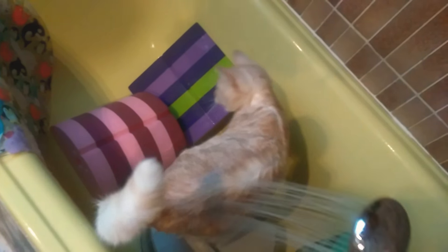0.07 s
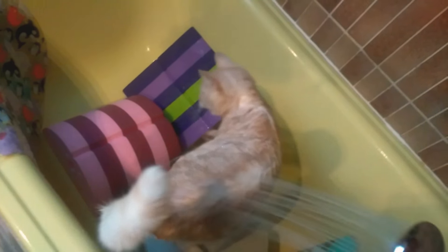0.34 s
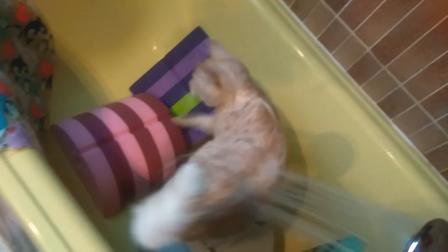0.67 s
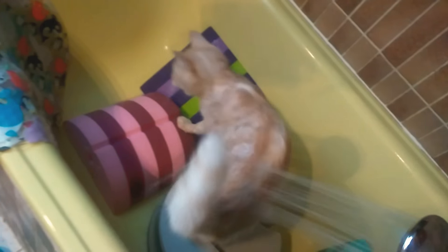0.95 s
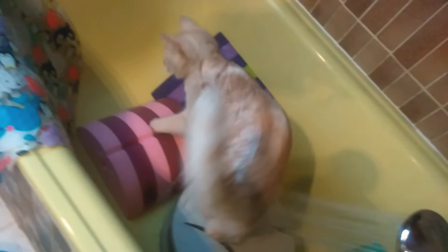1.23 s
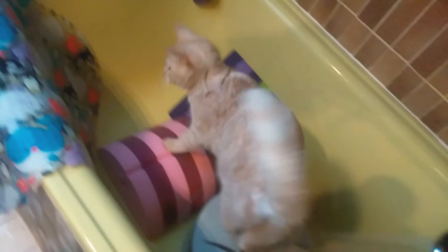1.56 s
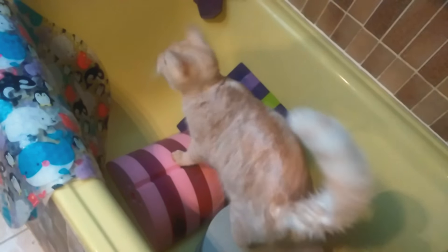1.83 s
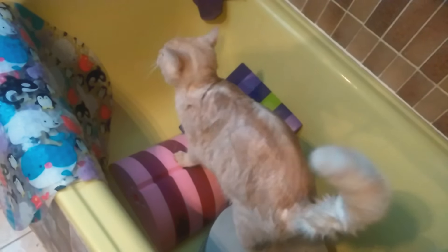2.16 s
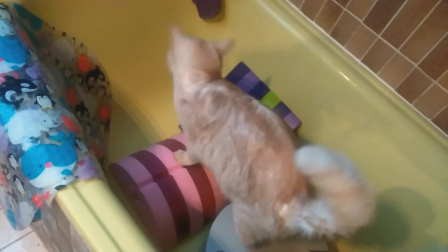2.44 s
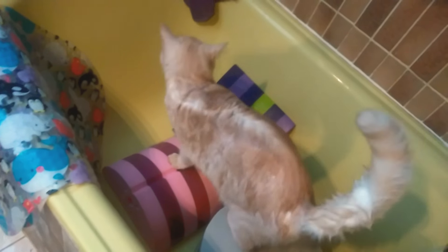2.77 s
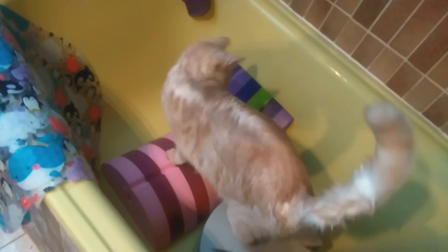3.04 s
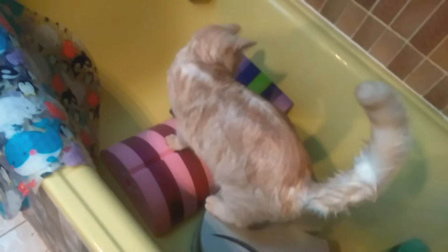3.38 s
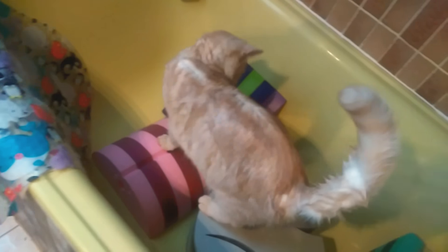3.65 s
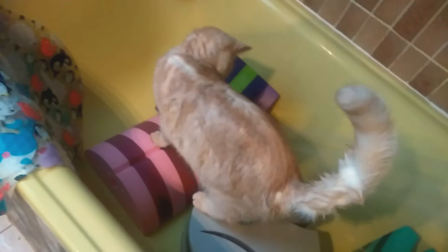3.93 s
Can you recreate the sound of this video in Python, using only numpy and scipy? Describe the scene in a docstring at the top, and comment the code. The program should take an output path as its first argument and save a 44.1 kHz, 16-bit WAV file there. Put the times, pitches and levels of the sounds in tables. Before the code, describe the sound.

Shower water spraying and splashing in a bathtub, with a couple of sharp clicks.

```python
"""A cat in a bathtub under a hand shower, in a small tiled bathroom, heard on two microphones
15 cm apart and of opposite polarity. After a short knock the jets drum on something hollow and a sharp
click rings off the tiles. About a second in they swing away: the drumming drops to the tub floor and
the droplets' hiss builds, with a second sharp click near 2.4 s. Larger bubbles ring toward the end.
Throughout, water runs down the tub with gushes of splatter, small bubbles and fainter ticks."""
import sys
import numpy as np
from scipy import signal
from scipy.fft import rfft, irfft, next_fast_len
from scipy.io import wavfile
from scipy.ndimage import uniform_filter1d, map_coordinates

SR = 44100
rng = np.random.default_rng(int(sys.argv[2]) if len(sys.argv) > 2 else 0)


def transcribe(signal):
    """Save signal, clipped to [-1, 1], as a 16-bit WAV file at the path in sys.argv[1]."""
    frames = np.atleast_2d(signal).T
    limited = np.clip(frames, -1, 1)
    pcm = np.round(limited * 32767).astype(np.int16)
    wavfile.write(sys.argv[1], SR, pcm)


N = 176400  # 4 s


def amp(db):
    """Decibels to gain."""
    return 10 ** (np.asarray(db) / 20)


def unit(x):
    """Scale to rms 1."""
    return x / np.sqrt(np.mean(x ** 2) + 1e-20)


def along(points, hz):
    """Read (freq_hz, value) points at hz, on a log frequency axis."""
    f, v = np.transpose(points)
    return np.interp(np.log(hz + 1), np.log(f + 1), v)


def curve(rows):
    """Join (time_s, value) points, one value per sample."""
    return np.interp(np.arange(N) / SR, *np.transpose(rows))


def wobble(rate):
    """A smooth random curve, rate knots a second."""
    return map_coordinates(rng.standard_normal(1024), [np.arange(N) * rate / SR], mode="mirror")


def filtered(x, response):
    """Filter x by a complex response of frequency."""
    size = next_fast_len(N + SR // 2)
    return irfft(rfft(x, size) * response(np.fft.rfftfreq(size, 1 / SR)), size)[..., :N]


def resonance(f, hz, width):
    """The response of one damped mode, width in Hz."""
    return 1j * f * width / (hz * hz - f * f + 1j * f * width)


def add(out, start_s, sound):
    """Mix a stereo sound in at start_s."""
    part = out[:, max(round(start_s * SR), 0):][:, :sound.shape[1]]
    part += sound[:, :part.shape[1]]


# Decay of the tiled bathroom: freq_hz, t60_s
ROOM_DECAY = [(200, .5), (3000, .2)]
def in_room(sound, walls_db=-3, tail_db=-2, walls_fade_s=.03, right_lag_s=.00014):
    """A short sound reaches the left microphone first, then bounces off tub and tiles and dies away."""
    hz, t, noise = signal.stft(rng.standard_normal((2, SR // 3)), SR, nperseg=256)
    tail = signal.istft(noise * amp(-60 * t / along(ROOM_DECAY, hz)[:, None]), SR, nperseg=256)[1]
    echoes = amp(tail_db) * tail / np.linalg.norm(tail[0])
    for mic in echoes:
        delay_s = .001 + .024 * rng.random(20) ** 2
        bounces = rng.choice([-1, 1], 20) * np.exp(-delay_s / walls_fade_s)
        np.add.at(mic, (delay_s * SR).astype(int), amp(walls_db) * bounces / np.linalg.norm(bounces))
    echoes[[0, 1], [0, round(right_lag_s * SR)]] += 1  # direct path
    return signal.fftconvolve(sound[None], echoes, axes=1)


def standing_waves(x, ripple_db=1.3, step_hz=20):
    """The small room favours some frequencies and starves their neighbours."""
    knots = rng.standard_normal(4096)
    ripple = lambda f: map_coordinates(knots, [f / step_hz], mode="mirror")
    return filtered(x, lambda f: amp(ripple_db / (1 + f / 8000) * ripple(f)))


def diffuse(pair, spacing_m=.15, sound_m_per_s=343):
    """Sound from all sides: alike at both microphones in the bass, unrelated in the treble."""
    def response(f):
        likeness = 0.96 * np.sinc(2 * f * spacing_m / sound_m_per_s) / (1 + (f / 1500) ** 4)
        angle = np.arccos(likeness) / 2
        return np.array([np.cos(angle), np.sin(angle)])
    mid, side = filtered(pair, response)
    return np.array([mid + side, mid - side])


def impacts(rate, spread_db, blur_db):
    """Two trains of random drop impacts, rate a second, in a blur of their echoes."""
    size = amp(spread_db * np.minimum(rng.exponential(size=(2, N)), np.pi))
    drops = (rng.random((2, N)) < rate / SR) * size * rng.choice([-1, 1], (2, N))
    return unit(drops) + amp(blur_db) * rng.standard_normal((2, N))


def patter(response, rate, spread_db, blur_db):
    """Drop impacts from all sides, coloured by response and by the room; rms 1."""
    drops = diffuse(impacts(rate, spread_db, blur_db))
    return unit(standing_waves(filtered(drops, response)))


def patchy(x, depth_db):
    """The colour of the splatter shifts from moment to moment; rms 1."""
    spectra = signal.stft(x, nperseg=512)[2]
    patches = uniform_filter1d(rng.standard_normal(spectra.shape[1:]), size=12, axis=0)
    patches = unit(uniform_filter1d(patches, size=9, axis=1))
    return unit(signal.istft(spectra * amp(depth_db * patches), nperseg=512)[1][:, :N])


def nozzle():
    """The shower head's own thin, steady fizz."""
    fizz = patter(lambda f: resonance(f, hz=11400, width=7100) ** 2, rate=3000, spread_db=9.5, blur_db=0)
    return fizz * amp(-56.5 + 0.94 * wobble(24.4))


def singing():
    """A narrow, flickering band of hiss near 3 kHz, heard early and again late."""
    band = unit(filtered(rng.standard_normal((2, N)), lambda f: resonance(f, hz=3030, width=300)))
    level_db = curve([(1, -56), (1.5, -64), (3.1, -73), (3.7, -52.5)])
    return band * amp(level_db + 0.47 * wobble(26.5))


def bubble(hz, t60, rise=0.099):
    """A bubble's ring starts softly and rises in pitch as it dies."""
    t = np.arange(SR // 8) / SR
    phase = 2 * np.pi * hz * (t + rise * t * t / (2 * t60))
    onset = 1 - np.exp(-t / 0.00079)
    return np.sin(phase) * amp(-60 * t / t60) * onset


# A short knock at the start, then larger bubbles near the end: start_s, pitch_hz, level_db, t60_s
KNOCK_AND_BUBBLES = [(.003, 2440, -15.5, 0.006), (3.367, 2790, -32.5, 0.019), (3.452, 1860, -38.5, 0.033),
                     (3.608, 2590, -39.5, .03), (3.664, 3580, -38, .017), (3.806, 860, -33.5, 0.012),
                     (3.818, 1230, -36, 0.035)]
def bubbles(small_count=130, ring_cycles=35):
    """One very short ring sounds as a knock; a few distinct bubbles ring among many faint ones."""
    out = np.zeros((2, N))
    for start_s, hz, db, t60 in KNOCK_AND_BUBBLES:
        add(out, start_s, amp(db) * in_room(bubble(hz, t60)))
    for when, pitch, strength in rng.random((small_count, 3)):
        hz, db = 1400 * 5 ** pitch, -55 + 11 * strength ** 2
        add(out, when * N / SR, amp(db) * in_room(bubble(hz, ring_cycles / hz)))
    return out


# Modes that ring in a click: pitch_hz, level_db, t60_s
CLICK_RING = [(2600, -6, .016), (2900, -5, .012), (3280, -7, .01), (4050, -5, .009), (4700, -13, .007),
              (8300, -20, .01)]
# Sharp clicks and fainter ticks: start_s, level_db, pitch_ratio
CLICK_HITS = [(.125, -21, 1), (0.4176, -40.5, 1.6), (0.992, -38.5, 0.96), (1.034, -33.5, 1.02),
              (1.296, -35, 2.1), (2.43, -29, 1.2), (3.723, -55, 1.2)]
def clicks():
    """Short hard clicks without bass ring off the tiles, a little left of the microphones."""
    t, out = np.arange(SR // 20) / SR, np.zeros((2, N))
    low_cut = signal.butter(6, 2250, "highpass", fs=SR, output="sos")
    for start_s, db, ratio in CLICK_HITS:
        ring = sum(amp(mode_db - 60 * t / t60) * np.sin(2 * np.pi * hz * ratio * t)
                   for hz, mode_db, t60 in CLICK_RING)
        crack = amp(-16 - 60 * t / .008) * rng.standard_normal(len(t))
        add(out, start_s, amp(db) * in_room(signal.sosfilt(low_cut, ring + crack)))
    return out * amp([[1], [-1.5]])


def drummed(modes):
    """Jets keep a body's modes ringing; each reaches the two microphones more or less alike; rms 1."""
    def response(f):
        return sum((-1) ** k * amp(db) * resonance(f, hz, width) * np.sqrt([[1 + alike], [1 - alike]])
                   for k, (hz, width, db, alike) in enumerate(modes))
    mid, side = filtered(impacts(rate=1500, spread_db=1, blur_db=4), response)
    return unit(np.array([mid + side, mid - side]))


# Modes of the hollow spot and the tub floor: pitch_hz, width_hz, level_db, mic_likeness (-1 to 1)
HOLLOW_MODES = [(390, 50, -8, .9), (495, 24, -1, .95), (557, 26, -2, .4), (603, 28, -3, .7),
                (637, 28, 1, .92), (748, 55, -4.5, .65), (828, 38, -4, 0), (947, 28, -5, 0),
                (1045, 45, -9, 0)]
FLOOR_MODES = [(88, 18, -11, .9), (172, 24, -2, .85), (215, 16, 0, .97), (325, 30, 1, .9),
               (385, 26, 0, .95), (490, 70, -1.5, .6)]
# Strength of the drumming on each: time_s, level_db
HOLLOW_LEVEL = [(0, -55.5), (.25, -49.5), (1.19, -49), (1.3, -73)]
FLOOR_LEVEL = [(.9, -61.5), (2.1, -54.5), (3.1, -53.5), (3.9, -61)]
def drumming():
    """The jets drum on a hollow spot, later on the tub floor."""
    hollow = drummed(HOLLOW_MODES) * amp(curve(HOLLOW_LEVEL))
    floor = drummed(FLOOR_MODES) * amp(curve(FLOOR_LEVEL) + 1.8 * wobble(18))
    return hollow + floor


# Colour of the running water: freq_hz, level_db
WASH_SPECTRUM = [(50, -4), (88, -2.5), (135, -11.5), (255, -9), (400, -3.5), (1050, -2.2), (1500, -2.5),
                 (3000, -2), (4200, -5), (5500, -10.5), (14000, -11.5)]
# Its strength: time_s, level_db
WASH_LEVEL = [(0, -44.5), (.8, -48), (1.45, -44.5), (2.95, -45), (3.3, -45.5), (4, -48)]
def wash():
    """Heavier drops splash in the water that runs down the tub."""
    drops = patter(lambda f: amp(along(WASH_SPECTRUM, f)), rate=900, spread_db=0, blur_db=4.5)
    return patchy(drops, depth_db=1.5) * amp(curve(WASH_LEVEL) + 0.29 * wobble(9.5))


# Gushes of splatter: peak_s, length_s, centre_hz, level_db
GUSHES = [(0.145, .03, 7900, -45.5), (0.437, 0.034, 1320, -50), (1.115, 0.021, 1600, -46.5),
          (1.18, 0.031, 2000, -46.5), (1.902, 0.038, 3640, -45), (2.438, 0.021, 3940, -39),
          (2.578, .021, 8500, -40.5), (2.66, 0.034, 8240, -42), (2.876, 0.086, 2910, -45),
          (3.016, 0.057, 4360, -42.5), (3.415, 0.082, 3320, -47.5), (3.798, 0.055, 4030, -45)]
def splashes(half_width_octaves=.65):
    """Broad gushes of splatter swell and fade as the jets sweep over the cat."""
    t, out = np.arange(N) / SR, np.zeros((2, N))
    for peak_s, length_s, hz, db in GUSHES:
        band = lambda f: np.exp(-(np.log2((f + 1) / hz) / half_width_octaves) ** 2 / 2)
        swell = np.exp(-2 * ((t - peak_s) / length_s) ** 2)
        out += patter(band, rate=1000, spread_db=3.5, blur_db=2) * amp(db) * swell
    return out


# Colour of the spray's hiss: freq_hz, level_db
SPRAY_SPECTRUM = [(1000, -32), (2500, -6.5), (5300, -3), (8000, 1.5), (12000, 2.4), (16000, -6.5)]
# Its strength: time_s, level_db
SPRAY_LEVEL = [(0, -49), (.11, -68), (.19, -44.5), (.28, -61), (.62, -53), (.85, -55.5), (1.11, -48.5),
               (1.26, -53.5), (1.31, -45), (1.46, -44.5), (1.61, -48), (1.9, -42.5), (2.13, -42.5),
               (2.32, -43.5), (2.93, -43.5), (3.44, -46.5), (3.57, -51.5), (3.66, -47.5), (3.82, -43.5),
               (4, -51)]
def spray():
    """Fine droplets hiss on fur and wet enamel."""
    drops = patter(lambda f: amp(along(SPRAY_SPECTRUM, f)), rate=2500, spread_db=3.5, blur_db=3)
    return patchy(drops, depth_db=1.2) * amp(curve(SPRAY_LEVEL) + 0.9 * wobble(30))


def scene():
    """Everything in the tub, as it arrives at the two microphones."""
    return nozzle() + spray() + wash() + drumming() + singing() + splashes() + bubbles() + clicks()


# Right microphone over the left: freq_hz, gain_db
MIC_BALANCE = [(100, 1.5), (800, 1.1), (1500, -0.5), (2200, 3.5), (3400, -2), (4600, 0.8), (5500, 3.5),
               (10500, 4), (14500, 0.5)]
def record(dry):
    """The spaced microphones differ in colour and polarity; nothing is kept above 15.9 kHz."""
    def response(f):
        half_db = along(MIC_BALANCE, f) / 2
        return np.array([amp(-half_db), -amp(half_db)]) * (f < 15900)
    return filtered(dry, response)


dry = scene()
out = record(dry)
transcribe(out)
```